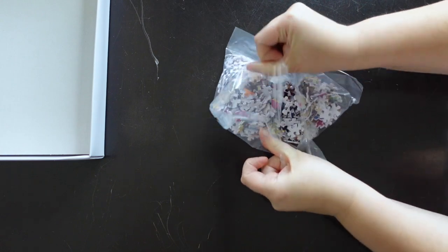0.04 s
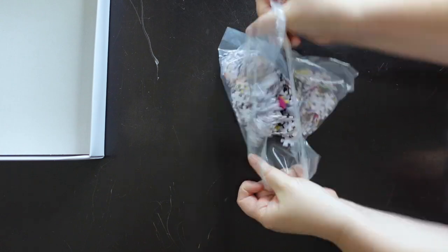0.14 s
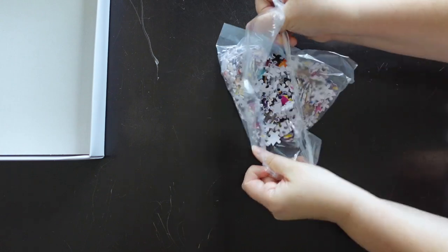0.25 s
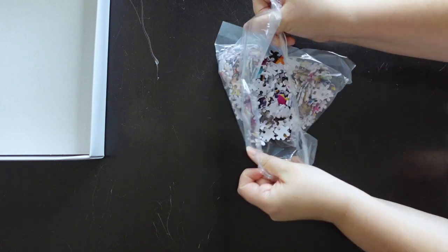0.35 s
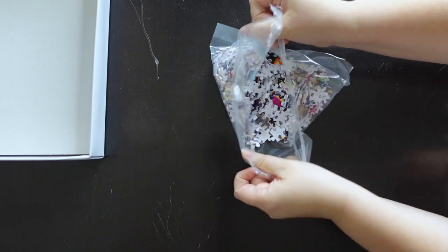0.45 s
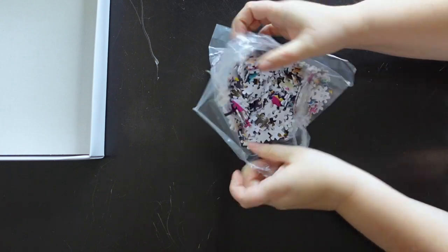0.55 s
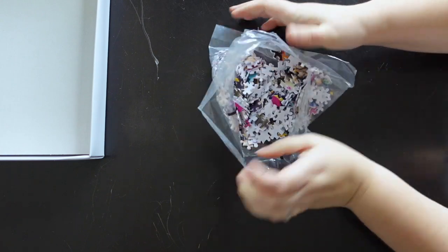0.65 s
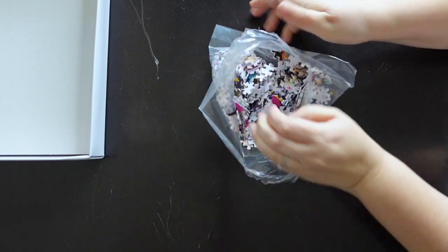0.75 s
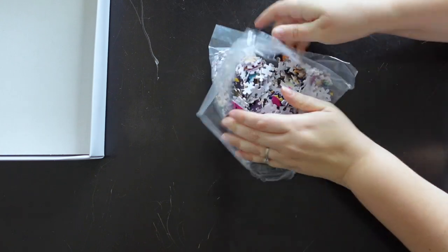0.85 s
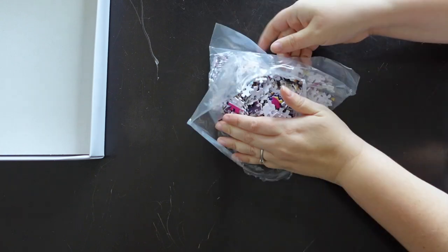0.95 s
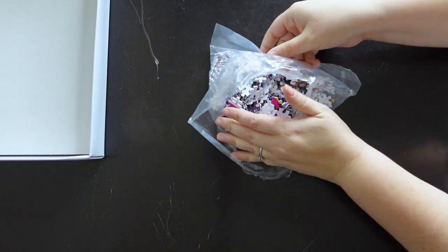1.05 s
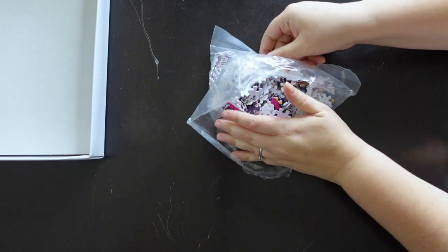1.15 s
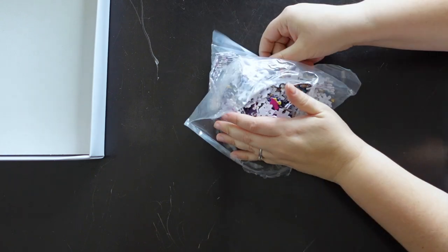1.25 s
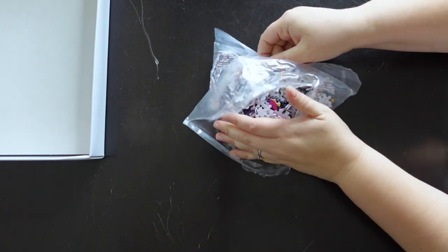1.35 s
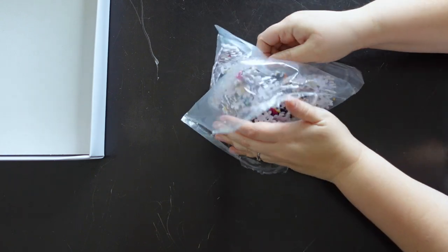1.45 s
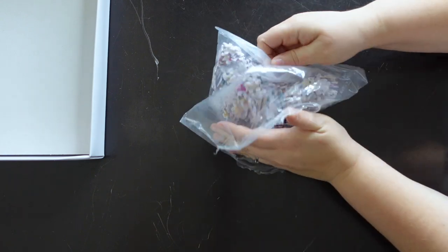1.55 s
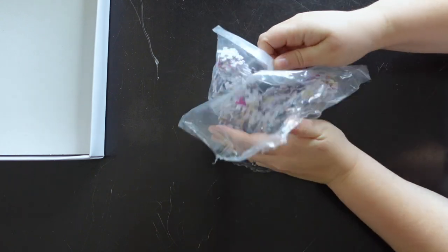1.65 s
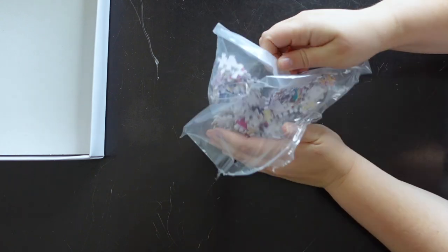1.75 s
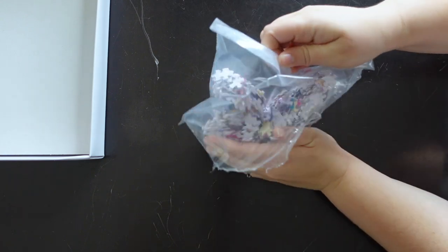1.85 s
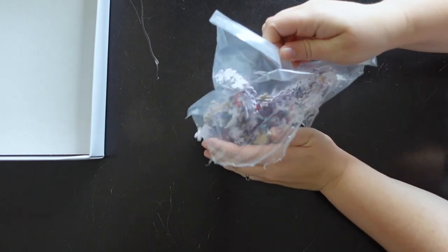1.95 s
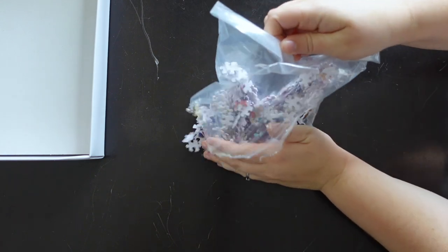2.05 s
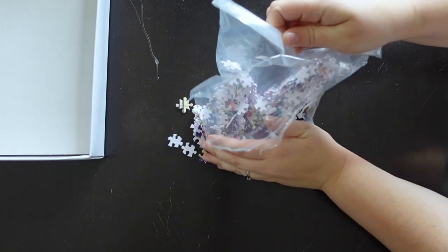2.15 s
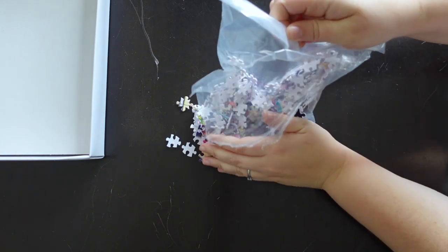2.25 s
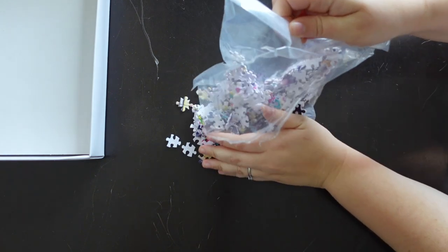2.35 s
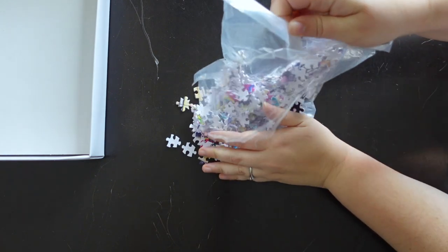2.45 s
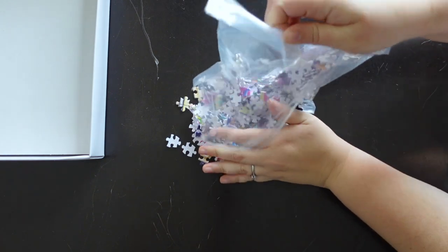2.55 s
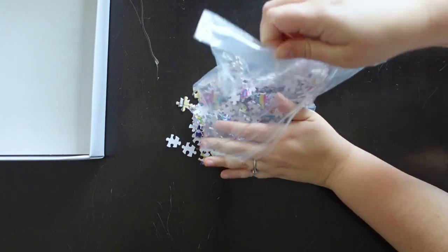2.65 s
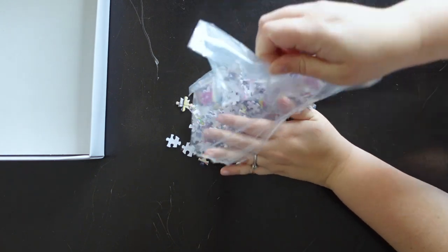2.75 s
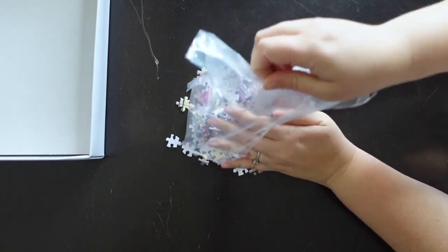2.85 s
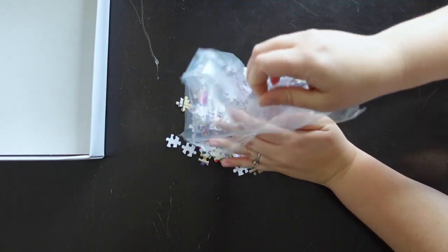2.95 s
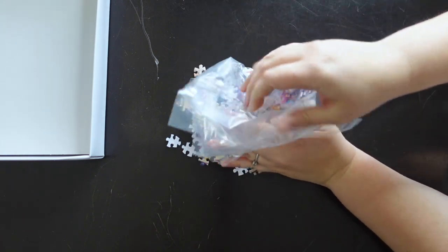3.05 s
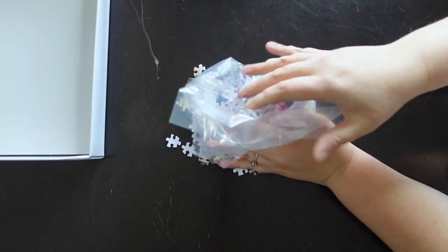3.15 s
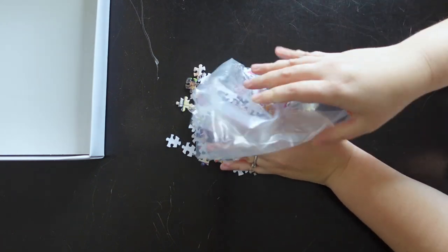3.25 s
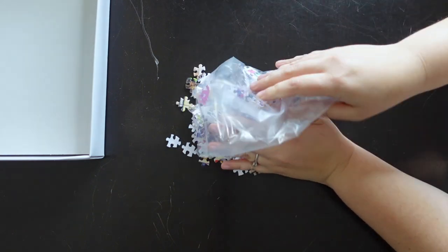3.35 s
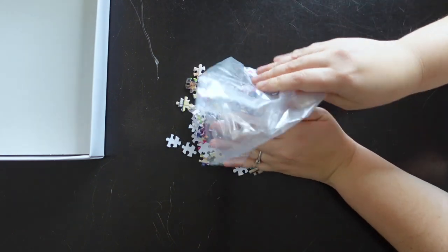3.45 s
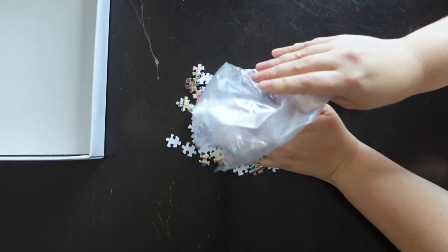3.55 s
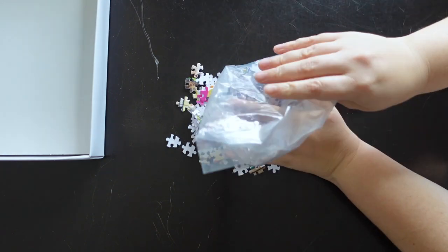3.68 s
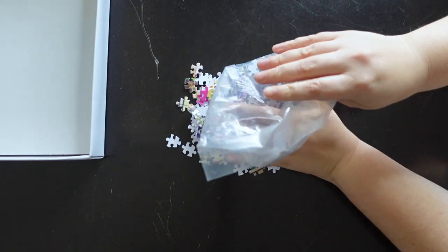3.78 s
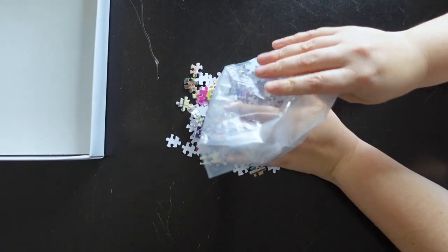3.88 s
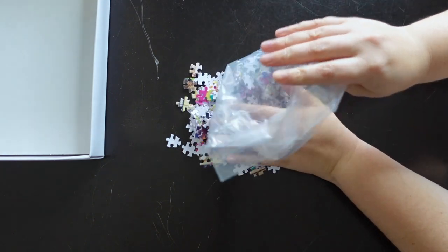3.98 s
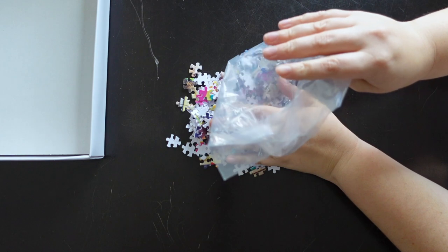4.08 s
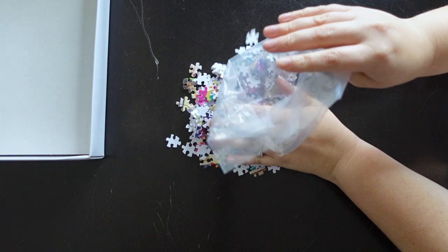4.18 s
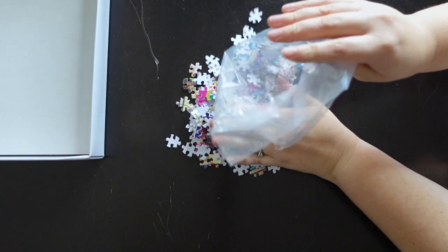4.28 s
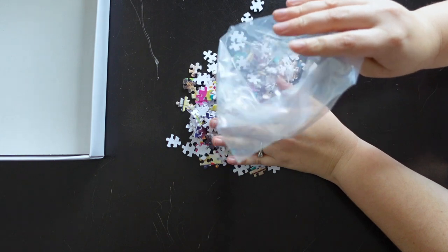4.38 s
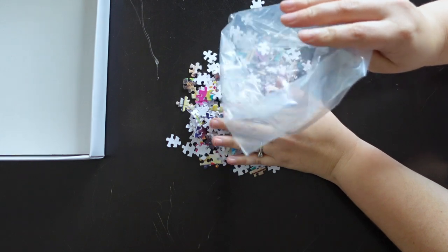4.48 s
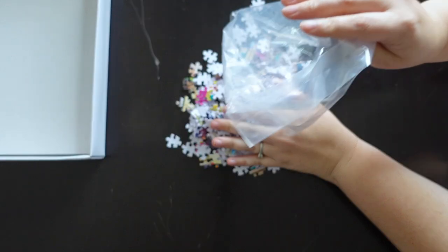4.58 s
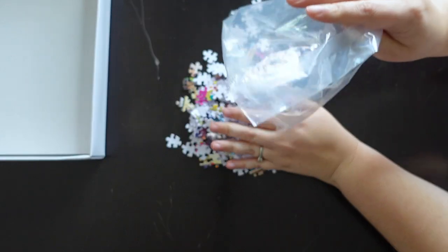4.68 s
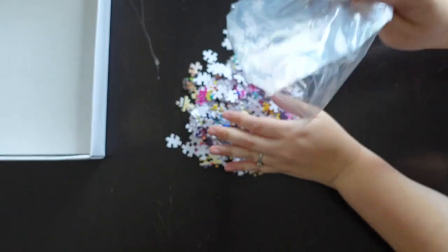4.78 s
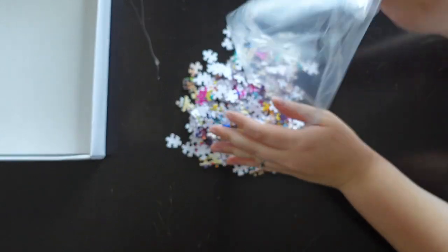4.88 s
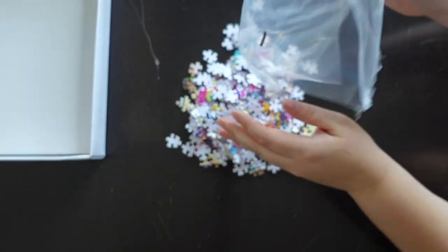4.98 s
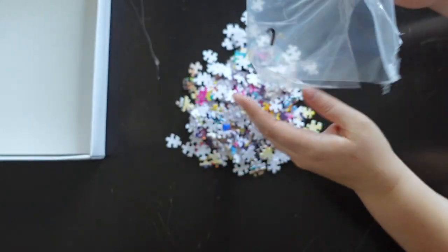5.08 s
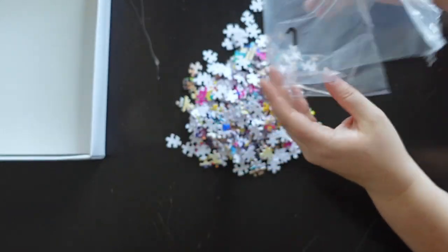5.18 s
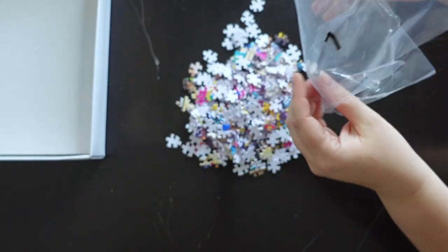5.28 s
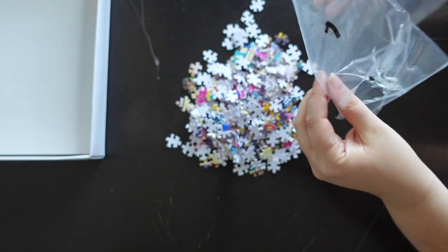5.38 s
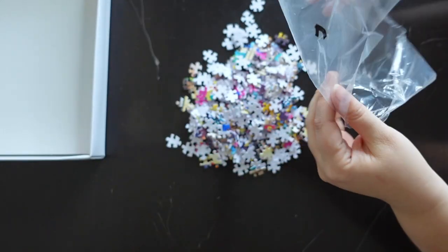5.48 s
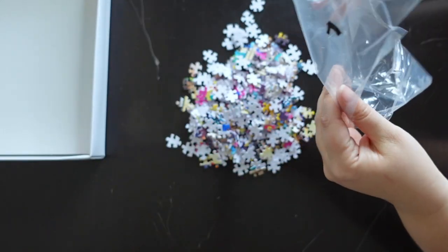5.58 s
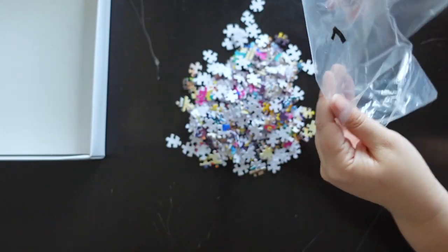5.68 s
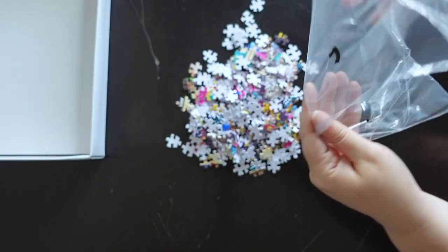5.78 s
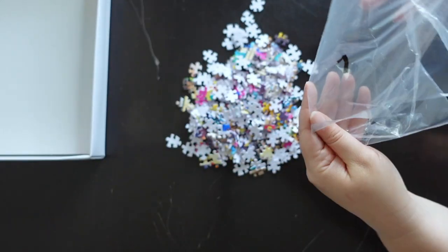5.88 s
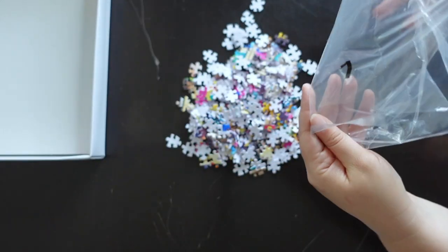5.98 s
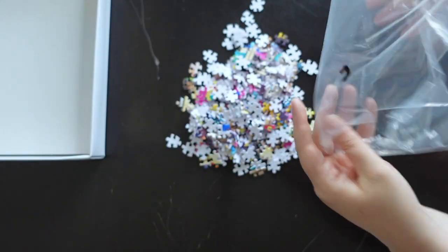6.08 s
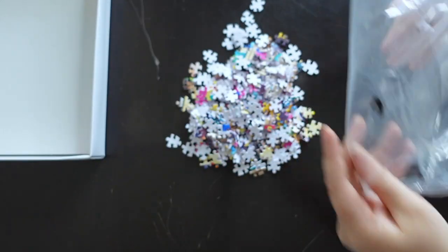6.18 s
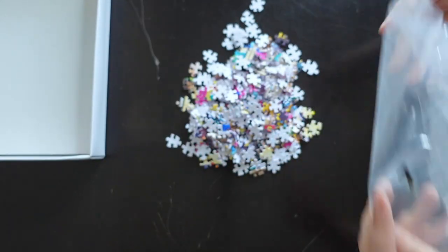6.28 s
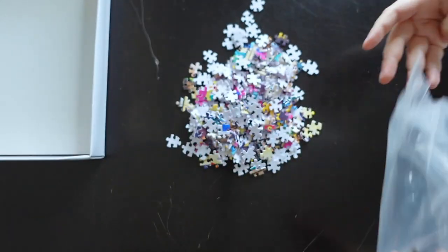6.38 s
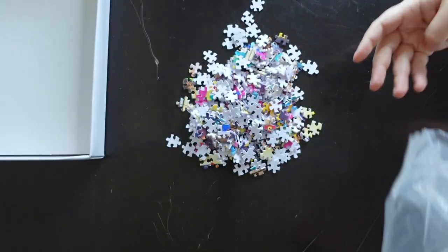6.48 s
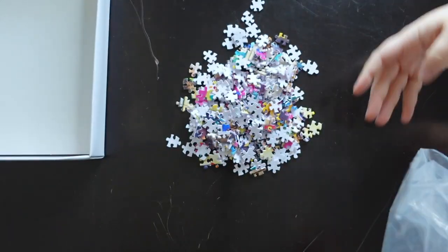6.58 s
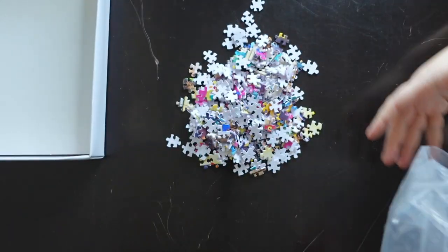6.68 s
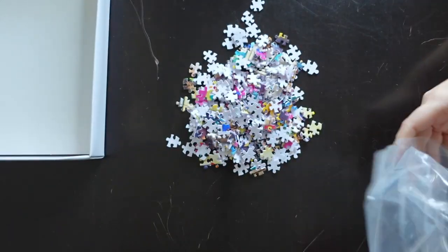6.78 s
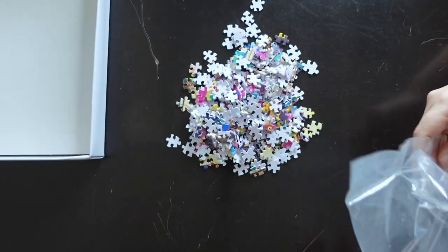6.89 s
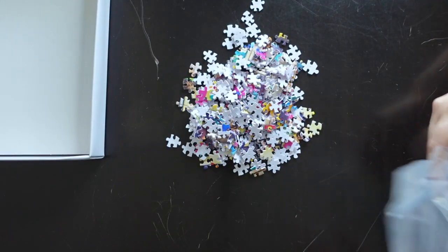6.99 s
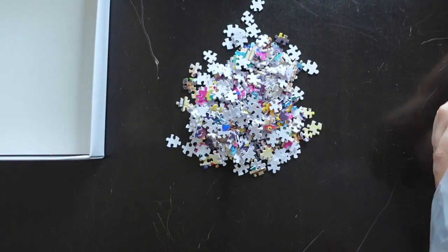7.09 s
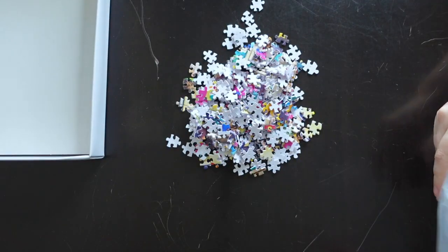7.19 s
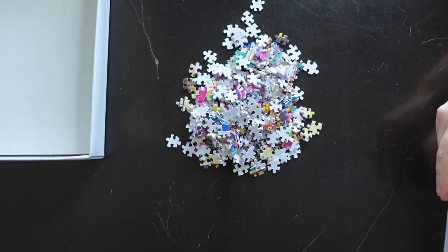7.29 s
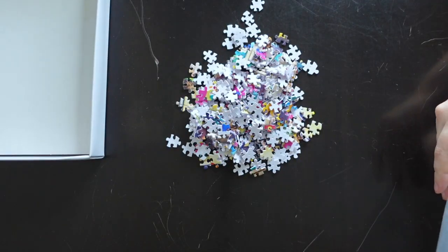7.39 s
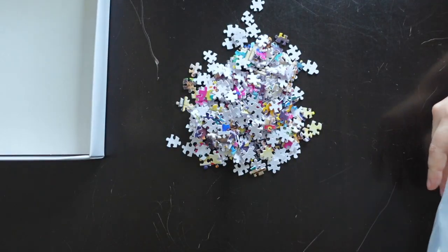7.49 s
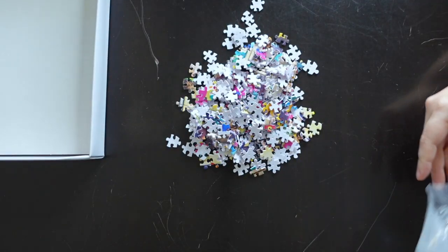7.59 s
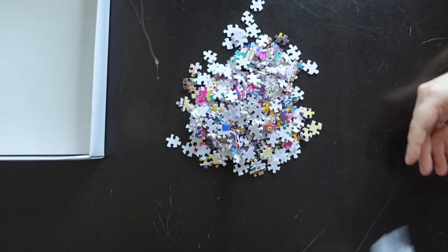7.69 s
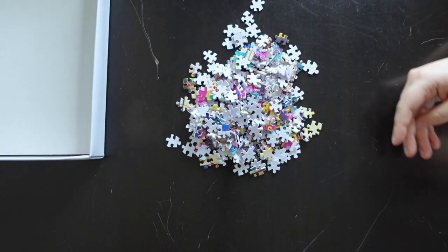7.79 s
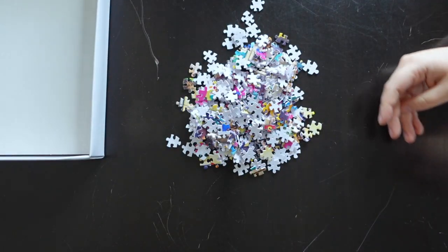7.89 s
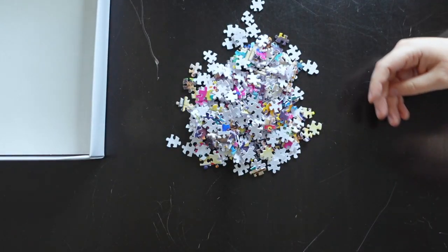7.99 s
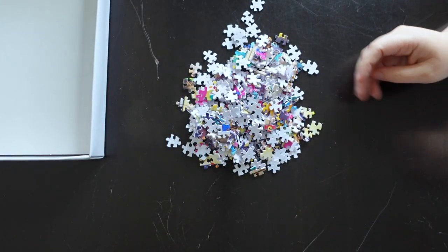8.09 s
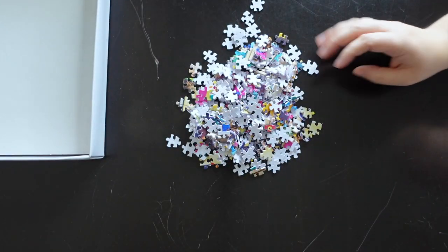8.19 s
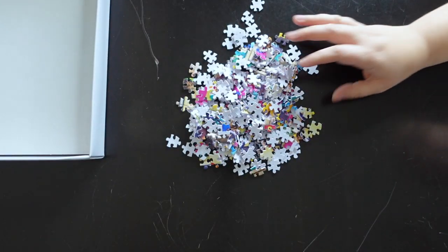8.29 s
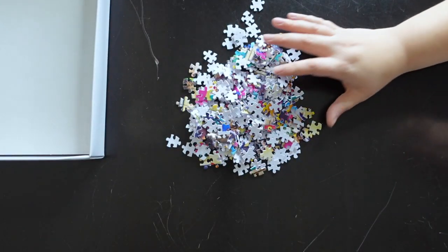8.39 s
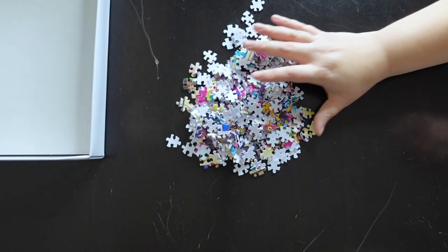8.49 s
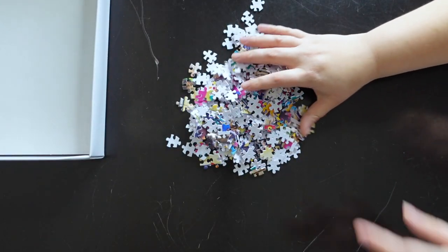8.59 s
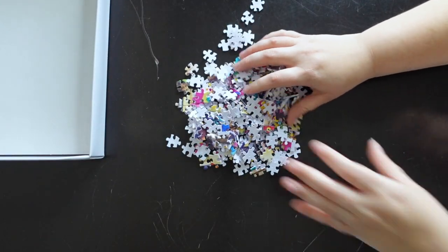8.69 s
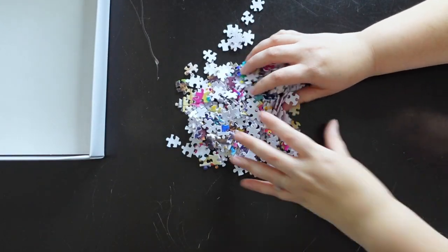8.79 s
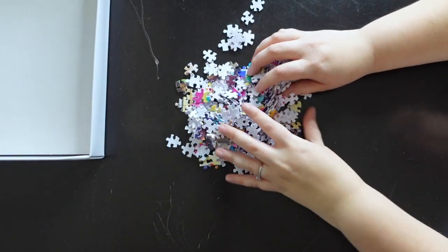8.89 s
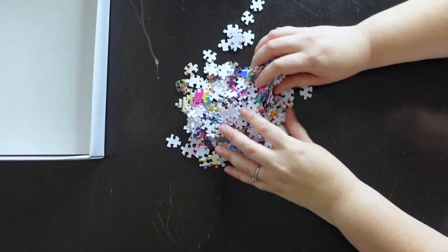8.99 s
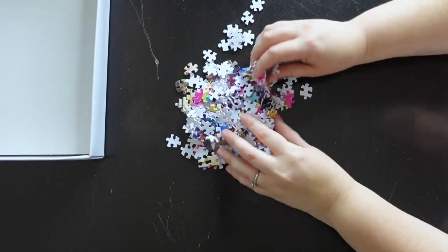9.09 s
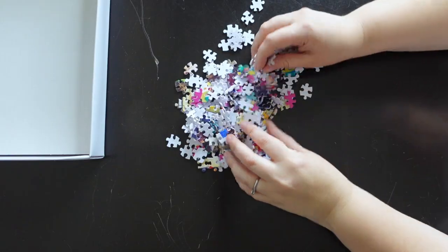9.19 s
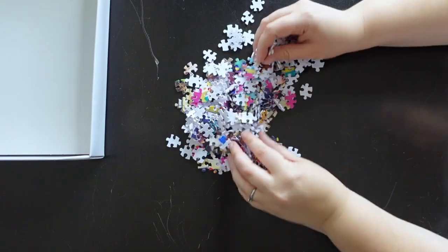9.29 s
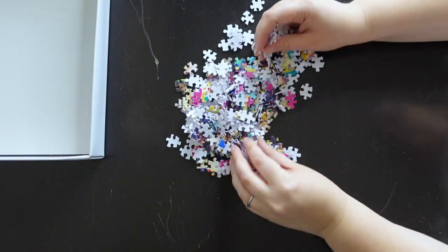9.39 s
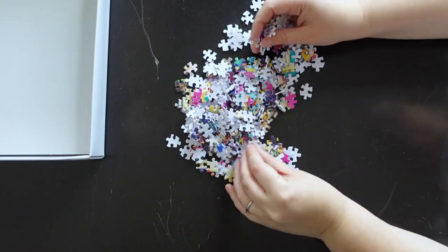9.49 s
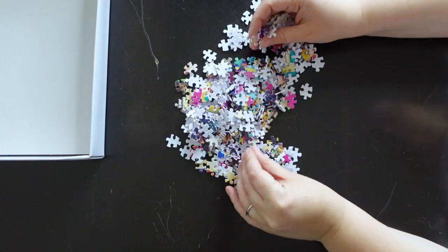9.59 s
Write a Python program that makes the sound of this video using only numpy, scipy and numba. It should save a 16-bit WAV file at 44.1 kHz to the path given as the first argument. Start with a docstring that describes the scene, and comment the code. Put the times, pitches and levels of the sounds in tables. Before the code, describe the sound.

Close above a table in a small quiet room, a plastic bag is tugged open with sharp crackles and a brief seal tear. Jigsaw pieces slide out in several ticking, faintly ringing showers amid loud film crinkling. After a near-silent gap the empty bag rustles softly to the right, then two hands push through the heap with a bright dry rattle.

```python
"""A plastic zip bag is tugged open over a table: film crackles, creases snap and the seal tears.
Jigsaw pieces slide out of it onto a heap, as showers of ticks, high rings, knocks and single clacks.
The heap creaks faintly, the empty bag crinkles a little to the right, an arm slides on the table,
then two hands spread the heap. Film and pieces are random ticks and noise bursts ringing short modes,
shaped by timed gains. A small room answers, heard from close above the table over a steady hush."""
import sys
import numpy as np
from scipy import signal
from scipy.fft import rfft, irfft, next_fast_len
from scipy.io import wavfile
from scipy.ndimage import uniform_filter1d
from numba import njit

SR = 44100
rng = np.random.default_rng(int(sys.argv[2]) if len(sys.argv) > 2 else 0)


def master(y):
    """Save y as 16-bit WAV."""
    cut = np.clip(np.atleast_2d(y).T, -1, 1)
    pcm = np.round(cut * 32767)  # scale
    wavfile.write(sys.argv[1], SR, pcm.astype(np.int16))


N = 425124

# faint rustle between the stronger movements, before the layer trims: time_s, level_db
HELD_RUSTLE = [(0, -42), (.75, -49), (1.1, -43), (1.55, -34), (3.5, -36), (4.55, -43), (4.75, -77),
               (5.1, -52.5), (5.25, -45), (6.35, -41), (6.68, -53), (7.1, -46), (7.95, -45.5), (8.2, -38.5),
               (8.55, -45.5)]
# bright colour of pieces ticking edge to edge: frequency_hz, relative level_db (per Hz)
RATTLE_COLOUR = [(100, -79), (1500, -32), (3000, 5), (6000, 2), (9000, 2), (12500, 2.5), (14500, -3.5),
                 (16000, -11)]


def amp(db):
    """Decibels to gain."""
    return 10 ** (np.asarray(db) / 20)


def unit(x):
    """Scale to rms 1."""
    return x / np.sqrt(np.mean(x ** 2) + 1e-20)


def along(points, hz):
    """Read a curve of (Hz, value) points on a log frequency axis."""
    f, v = np.transpose(points)
    return np.interp(np.log(hz + 1), np.log(f + 1), v)


def gain_curve(rows):
    """Gain per sample through (s, dB) points, at -120 dB outside them."""
    times, level_db = np.transpose(rows)
    return amp(np.interp(np.arange(N) / SR, times, level_db, left=-120, right=-120))


def filtered(x, response):
    """Multiply the spectrum of x by a response of frequency, with padding for the ring-out."""
    m = next_fast_len(x.shape[-1] + 8192, True)
    return irfft(rfft(x, m) * response(np.fft.rfftfreq(m, 1 / SR)), m)[..., :x.shape[-1]]


def causal(db):
    """Minimum-phase response with these levels: it rings only after its cause."""
    cepstrum = irfft(np.log(amp(db)))
    half = len(cepstrum) // 2
    folded = np.r_[cepstrum[0], 2 * cepstrum[1:half], np.zeros(half)]
    return np.exp(rfft(folded))


def coloured(x, spectrum):
    """Pass x through a body with this spectrum."""
    return filtered(x, lambda hz: causal(along(spectrum, hz)))


def resonant(x, modes):
    """Pass x through a few (Hz, width Hz, dB) resonances of alternating sign."""
    def response(f):
        total = 0
        for k, (centre, width, db) in enumerate(modes):
            damping = 1j * f * width
            total = total + (-1) ** k * amp(db) * damping / (centre * centre - f * f + damping)
        return total
    return filtered(x, response)


def add(track, s, sound):
    """Mix a sound into the track at s seconds."""
    start = max(round(s * SR), 0)
    part = track[start:start + len(sound)]
    part += sound[:len(part)]


def burst(t60):
    """A tiny random shudder with a sharp start."""
    t = np.arange(SR // 20) / SR
    return rng.standard_normal(len(t)) * amp(-60 * t / t60)


def ping(hz, t60):
    """The thin ring of a small stiff body: two close modes."""
    t = np.arange(SR // 10) / SR
    split = 1 + 0.02 * rng.standard_normal()
    modes = np.sin(2 * np.pi * hz * t) + 0.2 * np.sin(2 * np.pi * hz * split * t)
    return modes * amp(-60 * t / t60)


def steadied(x, span):
    """Even out the power over span seconds, keeping the single ticks."""
    local_power = np.abs(uniform_filter1d(x ** 2, int(span * SR) + 1))
    return x / np.sqrt(local_power + np.mean(x ** 2) / 100)


@njit
def damped_sines(length, starts, sizes, poles):
    """Sum of sines that each start at one sample and die away."""
    out = np.zeros(length)
    for start, size, pole in zip(starts, sizes, poles):
        z = size + 0j
        for i in range(start, min(length, start + int(-7 / np.log(abs(pole))))):
            z *= pole
            out[i] += z.imag
    return out


def crackle(spectrum, rate, spread_db, cycles, hold, span, count=3):
    """Random ticks, rate per second; each kicks count modes with a T60 of some cycles plus hold seconds."""
    draws = rng.random((int(rate * N / SR), 2 + 2 * count))
    starts = np.repeat((draws[:, 0] * N).astype(np.int64), count)
    size_db = np.repeat(-spread_db * np.log(np.maximum(draws[:, 1], .02)), count)
    hz = 90 * (16000 / 90) ** draws[:, 2::2].ravel()
    signs = np.sign(draws[:, 3::2].ravel() - .5)
    t60 = cycles / hz + hold
    sizes = amp(size_db) * np.sqrt(hz / t60) * signs  # equal energy per Hz
    poles = np.exp((2j * np.pi * hz - np.log(1000) / t60) / SR)
    return steadied(coloured(damped_sines(N, starts, sizes, poles), spectrum), span)


def stroke(start, length, attack, swell_db, release_db_per_s):
    """Gain of one movement: full onset at start, drift by swell_db to 0 dB at its end, then decay."""
    t = np.arange(N) / SR - start
    onset = np.clip(1 + t / attack, 0, 1)  # fades in ahead of the start
    swell = swell_db * (np.clip(t / length, 0, 1) - 1)
    release = release_db_per_s * np.clip(t - length, 0, 1)
    return onset * amp(swell - release)


def movement(rows, attack, swell_db, release_db_per_s):
    """Gain of a run of strokes, the strongest at each moment."""
    strokes = [amp(db) * stroke(s, length, attack, swell_db, release_db_per_s) for s, length, db in rows]
    return np.max(strokes, axis=0)


def background():
    """The steady hush of the room: coloured noise with a side gain that varies with frequency."""
    # colour of the hush: frequency_hz, relative level_db (per Hz)
    hush_colour = [(25, -45), (70, -21), (120, -8), (180, -2.5), (400, -3), (1020, -2.5), (1520, -7),
                   (2700, -13.5), (4740, -16), (12900, -21), (16000, -27)]
    # side gain of the hush by frequency: frequency_hz, gain (ratio)
    hush_side = [(100, 0.74), (400, 0.59), (1500, 1), (5000, 0.21), (12000, 0.033)]
    mid, side = coloured(rng.standard_normal((2, N)), hush_colour)
    side = filtered(side, lambda hz: along(hush_side, hz))
    return amp(-50) * unit(np.array([mid + side, mid - side]))


def handling():
    """Gains of crinkle and flex: the strongest movement of the moment, or the faint rustle between."""
    # each pull, squeeze or shake of the bag; the last is an arm sliding on the table.
    # before the layer trims: start_s, length_s, crinkle_db, flex_db (flexing of the whole sheet)
    movements = [(0, 0.17, -28, -43), (0.154, 0.053, -16.5, -23), (0.235, 0.059, -24.5, -30.5),
                 (0.338, 0.1, -33, -48), (0.502, 0.11, -25, -38.5), (0.875, 0.088, -25.5, -39.5),
                 (1.2, 0.084, -34, -57), (1.466, 0.024, -20.5, -37.5), (1.579, .29, -23.5, -35),
                 (1.92, 0.17, -19.5, -35), (2.122, 0.2, -26, -38.5), (2.338, 0.21, -26, -36),
                 (2.588, .32, -28.5, -41), (2.926, .17, -23, -39.5), (3.112, 0.15, -26.5, -40.5),
                 (3.339, 0.027, -21, -32.5), (3.612, .18, -27, -40), (3.954, 0.047, -26.5, -44),
                 (4.027, 0.076, -22, -37), (4.135, 0.32, -32, -39), (4.5, 0.088, -34, -41),
                 (5.178, 0.12, -33.5, -37.5), (5.384, .17, -37, -41.5), (5.722, 0.1, -27, -34),
                 (5.879, 0.038, -32, -37), (5.993, 0.073, -37, -39.5), (6.107, 0.018, -33.5, -36),
                 (6.175, 0.12, -31, -33.5), (6.74, 0.056, -42.5, -44), (6.838, .17, -32, -37),
                 (7.042, 0.033, -31.5, -36.5), (7.141, .05, -31, -34.5), (7.201, 0.069, -22, -27),
                 (7.355, 0.023, -23, -40), (7.503, 0.015, -32.5, -46), (7.56, 0.0099, -37.5, -36.5),
                 (7.737, 0.068, -36.5, -49), (8.055, 0.017, -33, -41), (8.182, .18, -34.5, -46.5)]
    crinkle = gain_curve(HELD_RUSTLE)
    flex = amp(-10) * crinkle  # little flexing between movements
    for s, length, crinkle_db, flex_db in movements:
        # sets in, swells a little and dies away
        gain = stroke(s, length, attack=0.021, swell_db=1.5, release_db_per_s=260)
        crinkle = np.maximum(crinkle, amp(crinkle_db) * gain)
        flex = np.maximum(flex, amp(flex_db) * gain)
    return crinkle, flex


def crackling_film(crinkle):
    """Many small creases of the film crackle with short bright modes."""
    # colour of the creases: frequency_hz, relative level_db (per Hz)
    film_colour = [(530, -40), (900, -3.5), (2450, 4), (2630, 3.5), (3040, 2.5), (3380, 1), (4310, 0.5),
                   (5890, -1), (10000, -15), (13200, -16.5), (16000, -21)]
    ticks = crackle(film_colour, rate=1100, spread_db=3.0, cycles=19.0, hold=0.0058, span=0.063)
    return amp(-4) * crinkle * ticks


def flexing_sheet(flex):
    """The whole sheet flexes with duller crumples."""
    # colour of the crumples: frequency_hz, relative level_db (per Hz)
    sheet_colour = [(53, -59), (90, -42), (119, -17.5), (212, -18), (291, -13.5), (331, -9.5), (573, -4),
                    (618, -3), (676, -1.5), (1040, -4), (1420, -2), (1900, -0.5), (2470, -23.5),
                    (4180, -120)]
    crumples = crackle(sheet_colour, rate=1300, spread_db=4, cycles=5.1, hold=0.0024, span=0.039)
    return amp(-1) * flex * crumples


def skin_swish(crinkle):
    """Film sliding on skin swishes as smooth coloured noise."""
    # colour of the swish: frequency_hz, relative level_db (per Hz)
    swish_colour = [(200, -27), (600, -10), (2000, 1), (5500, -0.5), (9000, -5.5), (13000, -12),
                    (16000, -28)]
    return amp(-8.5) * crinkle * unit(coloured(rng.standard_normal(N), swish_colour))


def small_snaps(crinkle):
    """Lesser creases flip at random, louder the stronger the crinkle."""
    rate_per_s, over_crinkle_db, scatter_db, ceiling_db = 16, 9, 4, -16.5
    pitch_hz, scatter_octaves, treble_db = 2710, 0.49, -21
    draws = rng.standard_normal((300, 3))
    times = np.cumsum((.2 + np.abs(draws[:, 0])) / rate_per_s)
    rows = []
    for s, (_, size, pitch) in zip(times, draws):
        if s < HELD_RUSTLE[-1][0]:
            level_db = 20 * np.log10(crinkle[int(s * SR)]) + over_crinkle_db + scatter_db * size
            facet_hz = pitch_hz * 2 ** (scatter_octaves * pitch)
            rows.append((s, min(level_db, ceiling_db), facet_hz, treble_db))
    return rows


def snaps(crinkle):
    """A crease flips, rings its facet and settles with a second flick."""
    # the loudest creases that snap through:
    # start_s, relative level_db, pitch_hz of the facet, treble_db (brightness, -28 adds no tilt)
    loud_snaps = [(0.028, -12, 3230, -21), (0.071, -14, 1840, -22), (0.147, -0.5, 1390, -27),
                  (0.167, -3, 1450, -14), (0.363, -7, 2420, -23), (0.416, -12.5, 2230, -22),
                  (0.428, -14.5, 1890, -24), (0.478, -13, 3190, -17), (0.497, -12, 1650, -22),
                  (0.525, -6, 2170, -22), (0.544, -5, 2720, -17), (0.585, -7, 2430, -27),
                  (0.814, -30, 1280, -30), (0.872, -8, 4240, -25), (0.897, -10, 2710, -20),
                  (0.922, -11, 4900, -20), (0.957, -4.5, 4700, -15.5), (1.037, -16, 2290, -32),
                  (1.185, -23, 2190, -21), (1.256, -16.5, 3910, -27), (1.307, -8, 4200, -20.5),
                  (1.364, -19, 4020, -20), (1.399, -13.5, 2370, -28), (1.459, -4, 2400, -24.5),
                  (1.939, -2, 4850, -19), (1.966, -6, 3900, -25), (1.999, -3, 4940, -24),
                  (2.059, -4, 3630, -21), (2.196, -11, 2270, -16), (2.342, -10, 2780, -20),
                  (2.889, -9, 4100, -20), (2.968, -2, 2410, -25), (3.286, -10.5, 2320, -19),
                  (3.343, -6.5, 3400, -21), (3.419, -4.5, 4130, -17), (3.466, -9, 4240, -13),
                  (3.534, -17.5, 4300, -17), (3.76, -4, 2470, -23.5), (3.81, -14, 2510, -18),
                  (4.004, -10.5, 4000, -21), (4.069, -8, 2690, -15), (5.189, -10, 5200, -30),
                  (5.201, -4, 5200, -26), (5.234, -12, 1950, -23), (5.308, -13, 3130, -28),
                  (5.381, -20.5, 1240, -31), (5.453, -17, 3650, -32), (5.536, -11.5, 4500, -23.5),
                  (5.741, -5.5, 3600, -24), (5.803, -8.5, 4160, -19), (5.884, -7.5, 5070, -18),
                  (5.917, -10, 1780, -26), (5.989, -21, 3880, -30), (6.023, -17.5, 1770, -25),
                  (6.115, -19, 2120, -33), (6.183, -14, 3870, -27), (6.239, -9, 1580, -32),
                  (6.447, -23.5, 1720, -46), (6.739, -20.5, 5200, -32), (6.773, -17.5, 2200, -31),
                  (6.91, -12.5, 2960, -22), (7.067, -8.5, 3520, -30), (7.201, -8.5, 2410, -18),
                  (7.273, -8, 2230, -19), (7.565, -16.5, 1750, -34), (7.683, -20, 3460, -31),
                  (7.748, -14.5, 3900, -29), (8.004, -28.5, 2030, -32), (8.058, -12.5, 2490, -29),
                  (8.241, -17, 2180, -35), (8.272, -17.5, 1950, -32)]
    # colour of a snap: frequency_hz, relative level_db (per Hz)
    snap_colour = [(30, -52), (100, -25.5), (500, -13), (1300, -1.5), (2500, 4), (5500, -0.5), (9000, -10),
                   (16000, -28.5)]
    out = np.zeros(N)
    for s, db, pitch_hz, treble_db in [*loud_snaps, *small_snaps(crinkle)]:
        kick = burst(t60=.0045) + amp(-22) * burst(t60=.02)
        add(kick, rng.uniform(.0005, .0018), .7 * burst(t60=.009))  # the second flick

        def levels(hz):
            facet = 6 / (1 + (np.log((hz + 1) / pitch_hz) / 0.43) ** 2)
            edge = 1.33 * (treble_db + 28) * np.clip(np.log((hz + 1) / 4000), 0, 1)
            return along(snap_colour, hz) + facet + edge

        snap = filtered(kick, lambda hz: causal(levels(hz)))
        add(out, s, amp(db + 12) * snap / np.linalg.norm(snap))
        softness_db = np.clip(-treble_db - 21.5, 0, 10)  # dull snaps ring more than sharp ones
        add(out, s, amp(db - 20 + softness_db) * ping(pitch_hz, t60=.02))
    return out


def puffs():
    """The sheet tugged taut pushes a puff of air: one soft low pulse."""
    # the tugs: start_s, relative level_db
    tugs = [(0.146, -47), (0.956, -54), (1.457, -61), (3.419, -63), (3.759, -45), (5.189, -54),
            (6.238, -53), (7.067, -53)]
    out = np.zeros(N)
    u = np.arange(SR // 10) / SR / .0018
    pulse = (1 - u) * np.exp(-u) * (1 - np.exp(-4 * u))
    for s, db in tugs:
        add(out, s, amp(db) * pulse)
    return out


def zip_seal():
    """The seal lets go in a dense run of slips that ring the mouth of the bag."""
    # the seal tearing open, before a trim: time_s, level_db
    tear = [(0.15, -25), (0.158, -18), (0.222, -17), (0.232, -22), (0.352, -43), (0.36, -29)]
    # resonances of the open bag: centre_hz, width_hz, level_db
    mouth_modes = [(623, 61, -10.5), (1248, 70, -3.5), (1434, 91, -3), (1960, 160, -10)]
    slips = (rng.random(N) < 1500 / SR) * rng.standard_normal(N)
    return amp(-3) * gain_curve(tear) * unit(resonant(slips, mouth_modes))


def bag():
    """Film layers driven by the same handling, with the seal and the puffs."""
    crinkle, flex = handling()
    film = crackling_film(crinkle) + flexing_sheet(flex) + skin_swish(crinkle)
    return film + snaps(crinkle) + zip_seal() + puffs()


def tinkle(rate, spread_db, t60):
    """Many pieces ring faintly, each at its own high pitch."""
    # how the loose pieces ring: time_s, pitch_hz, scatter_octaves
    ring_pitch = [(0.2, 12800, 0.072), (2.1, 12500, 0.35), (3.2, 11750, 0.13), (4.1, 12170, 0.093),
                  (4.3, 12830, 0.036), (4.6, 11770, 0.019), (8.6, 11840, .14)]
    out = np.zeros(N)
    times, centre_hz, scatter = np.transpose(ring_pitch)
    for life, pitch, size in rng.standard_normal((int(rate * N / SR), 3)):
        s = rng.uniform(0, N / SR)
        octaves = np.interp(s, times, scatter) * pitch
        hz = np.interp(s, times, centre_hz) * 2 ** octaves
        add(out, s, amp(spread_db * size) * ping(hz, t60 * np.exp(0.18 * life)))
    return steadied(out, span=.08)


def sliding_pieces(ticks, rings, knocks, contacts):
    """Pieces shift in the bag and pour out: they tick, ring and knock, and the table rumbles."""
    # each batch that shifts or slides out, before the layer trims: start_s, length_s, level_db
    batches = [(.15, 0.084, -19.5), (.23, 0.065, -24), (.53, 0.085, -30), (1.49, 0.2, -38),
               (1.68, 0.25, -27), (1.92, .16, -23), (2.12, 0.12, -26.5), (2.35, 0.2, -27),
               (2.63, 0.27, -32.5), (2.86, 0.33, -30), (3.19, 0.17, -48), (3.61, .11, -33),
               (3.74, 0.047, -30), (3.99, 0.052, -29.5), (4.07, 0.097, -23), (4.16, 0.067, -28),
               (4.235, 0.044, -24.5), (4.28, .2, -29), (4.51, 0.071, -27)]
    # colour of the table top: frequency_hz, relative level_db (per Hz)
    table_colour = [(40, -41), (80, -26), (115, -5.5), (200, 2), (270, -7), (480, 0.5), (800, -20),
                    (2000, -33)]
    pour = movement(batches, attack=0.014, swell_db=-0.4, release_db_per_s=263)
    t = np.arange(N) / SR
    in_the_open = np.interp(t, [3.2, 4], [.35, 1])  # the bag no longer covers the heap
    # tightly packed pieces damp each other
    loose = np.interp(t, [.7, 2.1, 3.9, 4.2], [.3, 0.8, 0.84, 1.3])
    rumble = steadied(coloured(contacts, table_colour), span=0.32)
    bright = amp(-1.5) * ticks + amp(-6.5) * loose * rings
    return pour * (bright + amp(-6) * in_the_open * knocks + amp(-26) * rumble)


def clacks(count=4):
    """A piece lands and chatters: each contact is a dry clack, a bright tick of its edge and a short ring."""
    # the loudest pieces that hit the heap or the table:
    # start_s, relative level_db, ring pitch_hz, clack_db (dry clack, added to level_db)
    landings = [(2.117, -11, 10200, -17), (2.129, -11, 10200, -12), (2.152, -10, 14400, -15),
                (2.282, -12, 12700, -24), (2.391, -7, 9750, -8), (2.629, -18, 13300, -27),
                (2.861, -10, 12400, -17), (3.059, -13, 13100, -10), (3.878, -23, 12500, -21),
                (4.103, -4, 12000, -18), (4.136, -4.5, 11850, -23), (4.222, -7, 12600, -13.5),
                (4.5, -3.5, 11630, -21), (4.547, -3.5, 12500, -40), (8.676, -7, 12000, -10),
                (8.924, -12, 10800, -26), (8.961, -4, 11300, -15), (9.034, -10.5, 13800, -7.5),
                (9.253, -11, 9940, -6), (9.544, -7.5, 12700, -14), (9.596, -11.5, 10670, -17)]
    # colour of the dry clack: frequency_hz, relative level_db (per Hz)
    clack_colour = [(40, -39), (150, -33), (700, -14.5), (1900, 2), (4000, 7.5), (8000, -2), (16000, -35)]
    out = np.zeros(N)
    for s, db, ring_hz, clack_db in landings:
        gaps = rng.uniform(.002, 0.0063, count)
        for bounce, delay in enumerate(np.cumsum(gaps) - gaps[0]):
            level = db - 3 * bounce
            body = coloured(burst(t60=.012), clack_colour)
            edge = coloured(burst(t60=.012), RATTLE_COLOUR)
            add(out, s + delay, amp(level + clack_db + 20) * body / np.linalg.norm(body))
            add(out, s + delay, amp(level + 7) * edge / np.linalg.norm(edge))
            add(out, s + delay, amp(level - 8) * ping(ring_hz, t60=.035))
    return out


def settling_heap(contacts):
    """The heap creaks faintly as it settles: small contacts ring two narrow modes."""
    # the creak: time_s, level_db
    creak_level = [(4.78, -76), (4.815, -52), (4.86, -56), (4.95, -65), (5.05, -69)]
    creak = resonant(contacts, [(2610, 110, -2), (4770, 150, -8)])
    return gain_curve(creak_level) * unit(creak)


def spreading_hands(ticks, rings, knocks):
    """Hands push into the heap: pieces tick, ring and knock while they rub on the table."""
    # each push of the hands: start_s, length_s, level_db (before the layer trims)
    hand_pushes = [(8.59, 0.088, -26), (8.71, 0.21, -26), (9, 0.12, -23.5), (9.15, 0.067, -28),
                   (9.235, 0.033, -20.5), (9.3, .16, -26.5), (9.535, 0.017, -24.5), (9.59, .05, -29.5)]
    # colour of the rubbing: frequency_hz, relative level_db (per Hz)
    rub_colour = [(53, -60), (90, -24), (130, -14.5), (241, -16), (499, -7), (680, -12.5), (801, -5),
                  (1150, -7), (1790, 0.5), (2220, -8), (2620, -1), (2920, -4.5), (7000, -9.5), (9100, -31),
                  (15400, -120)]
    push = movement(hand_pushes, attack=0.037, swell_db=1.5, release_db_per_s=168)
    rubbing = crackle(rub_colour, rate=1800, spread_db=2, cycles=14, hold=0.0087, span=0.085)
    return push * (ticks + amp(-10.5) * rings + amp(-7.5) * knocks + amp(-5) * rubbing)


def pieces():
    """All sounds of the pieces, from shared streams of ticks, rings and random contacts."""
    # resonances of a piece in the heap: centre_hz, width_hz, level_db
    piece_modes = [(1963, 270, -2), (2626, 55, 2.5), (3540, 78, -5.5), (3970, 83, -2.5), (5750, 550, -6.5)]
    ticks = amp(-3) * crackle(RATTLE_COLOUR, rate=2600, spread_db=1.5, cycles=20, hold=0.018, span=0.049)
    rings = tinkle(rate=170, spread_db=5, t60=.035)
    sizes = amp(2.4 * rng.standard_normal(N)) * rng.choice([-1, 1], N)
    contacts = (rng.random(N) < 500 / SR) * sizes
    knocks = steadied(resonant(contacts, piece_modes), span=0.095)
    poured = sliding_pieces(ticks, rings, knocks, contacts) + clacks()
    return poured + settling_heap(contacts) + spreading_hands(ticks, rings, knocks)


def room(x, wet_db, early_db):
    """Near walls give a few early echoes and a short noise tail."""
    # decay time of the room: frequency_hz, t60_s
    room_t60 = [(150, .5), (500, .42), (1400, .45), (4000, .4), (10000, .29), (16000, .21)]
    # side gain of the tail by frequency: frequency_hz, gain (ratio)
    tail_side = [(100, .55), (400, .42), (1000, .3), (2500, .16), (6000, .16), (12000, .18)]
    hz, t, z = signal.stft(rng.standard_normal((2, SR // 2)), SR, nperseg=256)
    decay = amp(-60 * t / along(room_t60, hz)[:, None])
    tail = signal.istft(z * decay, SR, nperseg=256)[1]
    tail = amp(wet_db) * tail / np.linalg.norm(tail[0])
    for channel in tail:
        channel[rng.integers(0, SR // 50, size=8)] += amp(early_db) * rng.choice([-1, 1], size=8)
    tail = np.pad(tail, ((0, 0), (SR // 200, 0)))  # 5 ms before the tail begins
    mid, side = signal.fftconvolve(x[None], tail, axes=1)[:, :N]
    side = filtered(side, lambda hz: along(tail_side, hz))
    return np.array([mid + side, mid - side])


def scene():
    """The bag drifts to the right and partly back; the heap stays near the middle."""
    # place of the bag: time_s, pan_db (left minus right)
    bag_place = [(0, -.4), (4.6, -.2), (5.3, -1.9), (6.3, -2.3), (8, -1.9), (8.5, -1)]
    film, heap = [x + room(x, wet_db=-10, early_db=-24) for x in (bag(), pieces())]
    pan_db = np.interp(np.arange(N) / SR, *np.transpose(bag_place))
    panned_film = film * amp([pan_db / 2, -pan_db / 2])
    return panned_film + heap * amp([[.2], [-.2]]) + background()


def record(dry):
    """Thin the deep bass below 40 Hz, round the highest peaks and keep nothing from 16 kHz up."""
    thin = filtered(dry, lambda hz: (1j * hz / (1j * hz + 40)) ** 2)
    rounded = thin / (1 + (thin / .9) ** 4) ** .25
    return filtered(rounded, lambda hz: hz < 16000)


dry = scene()
out = record(dry)
master(out)
```